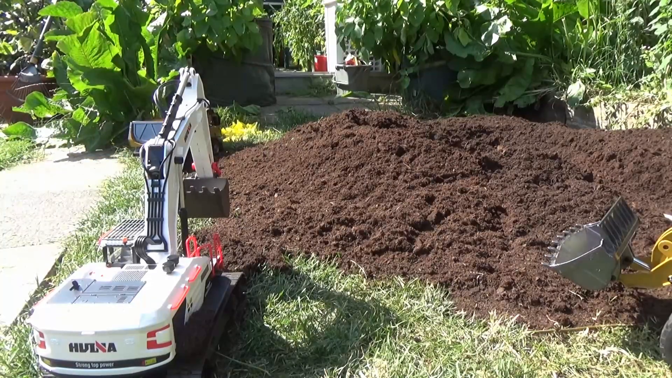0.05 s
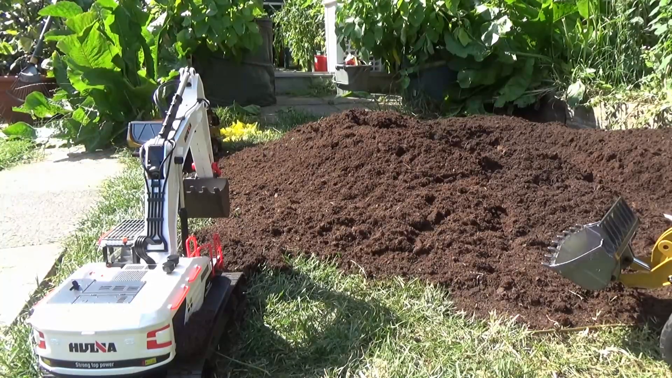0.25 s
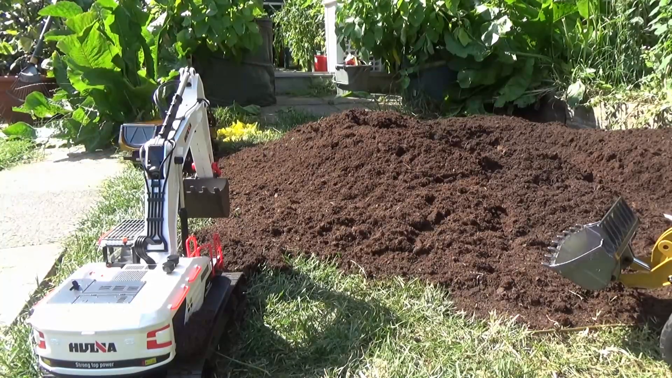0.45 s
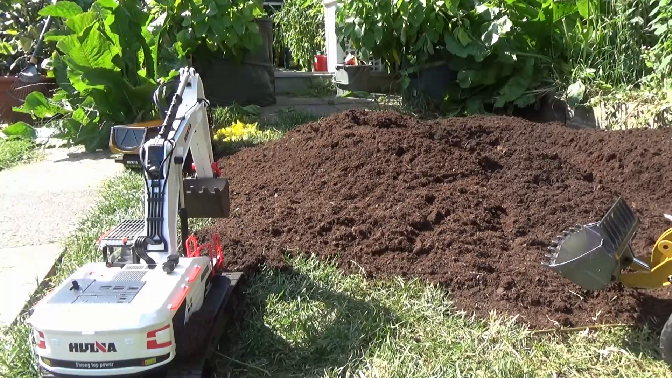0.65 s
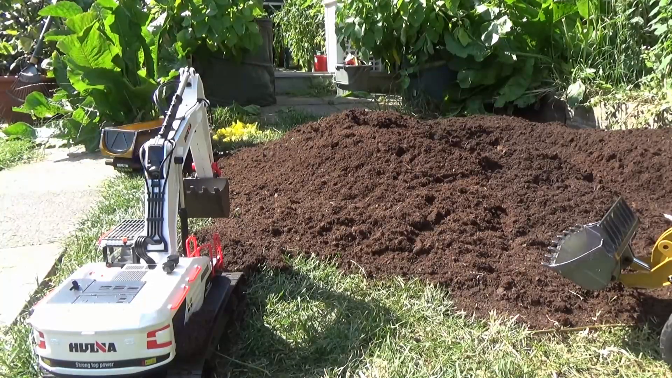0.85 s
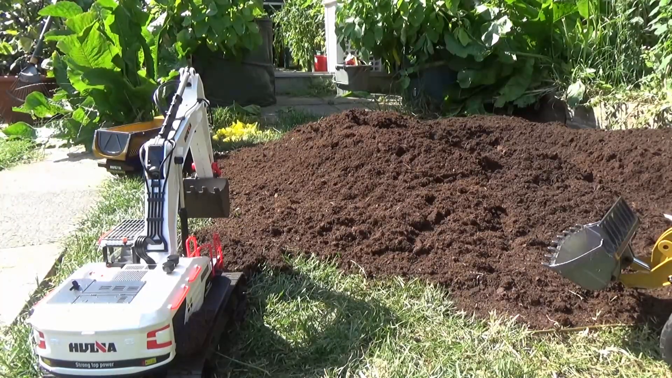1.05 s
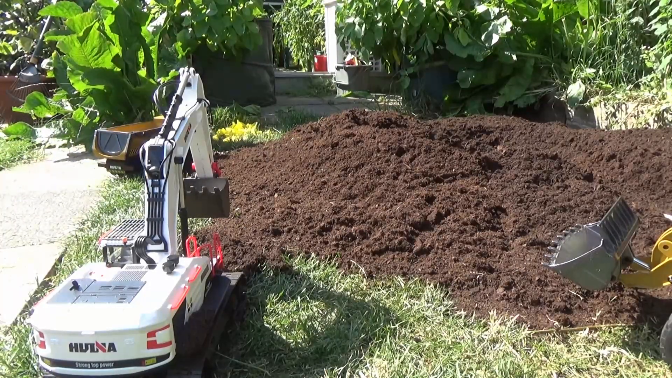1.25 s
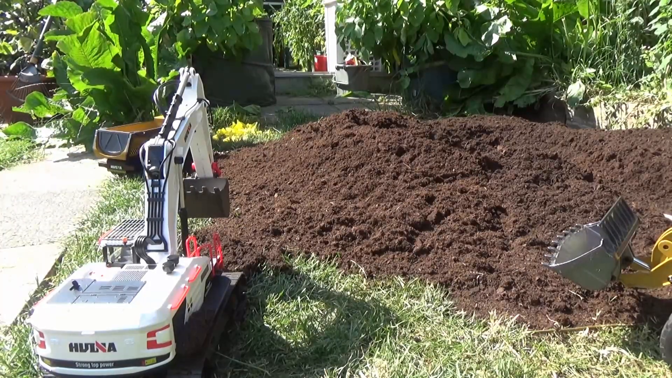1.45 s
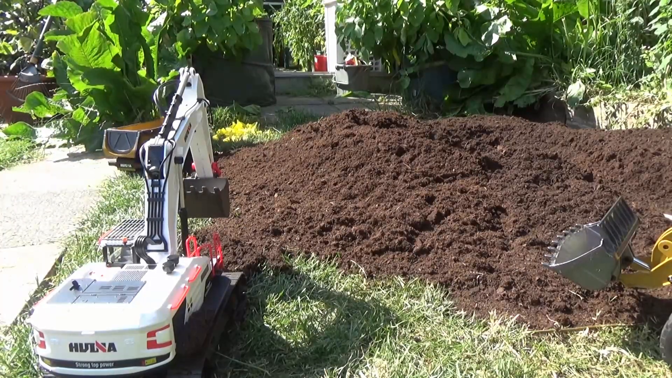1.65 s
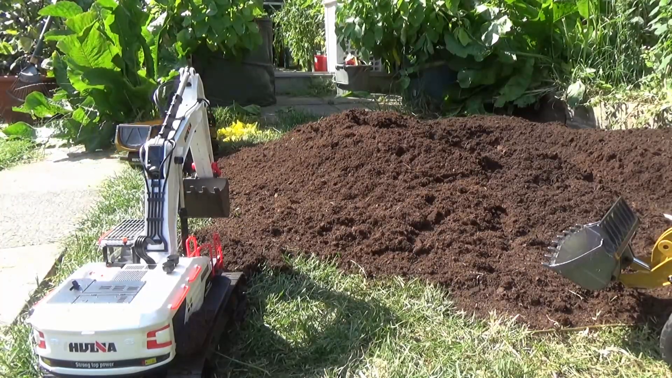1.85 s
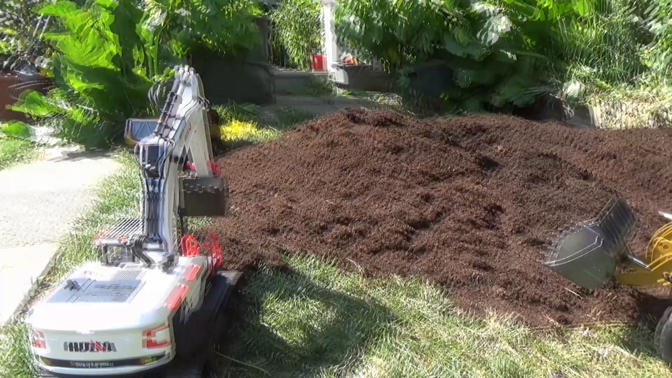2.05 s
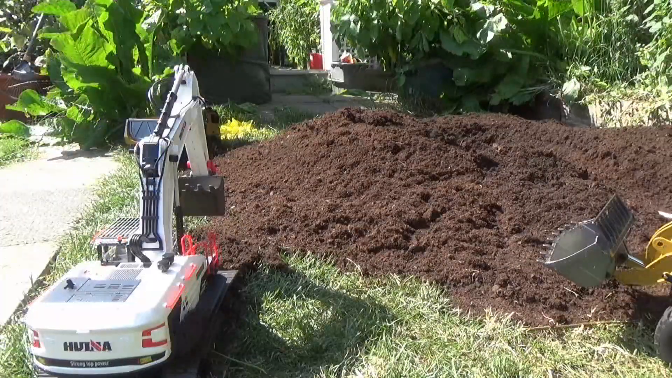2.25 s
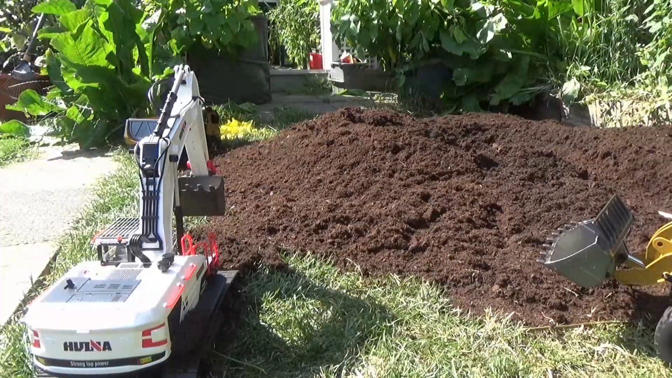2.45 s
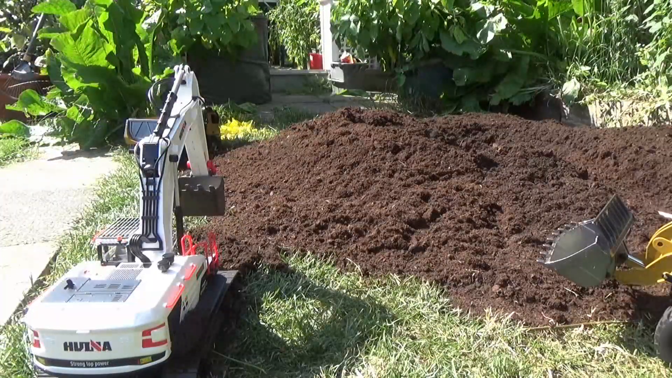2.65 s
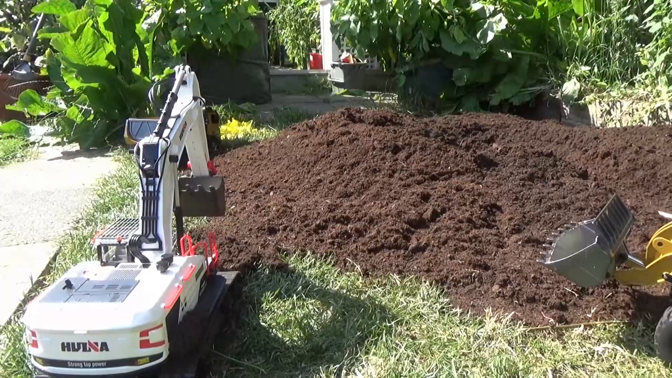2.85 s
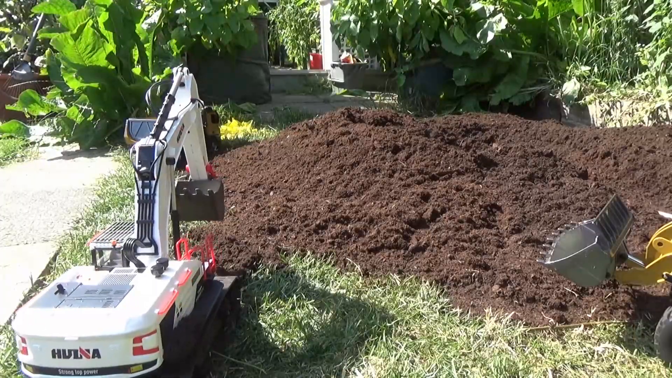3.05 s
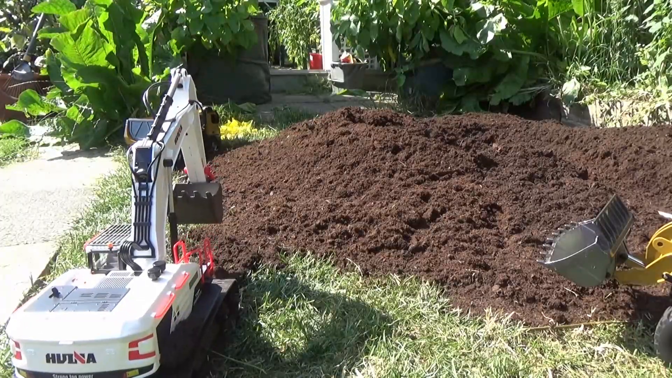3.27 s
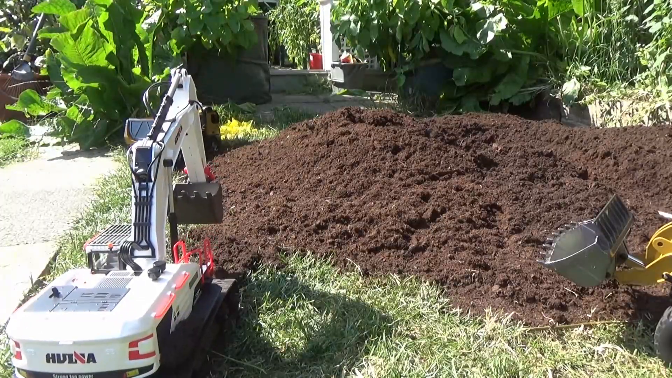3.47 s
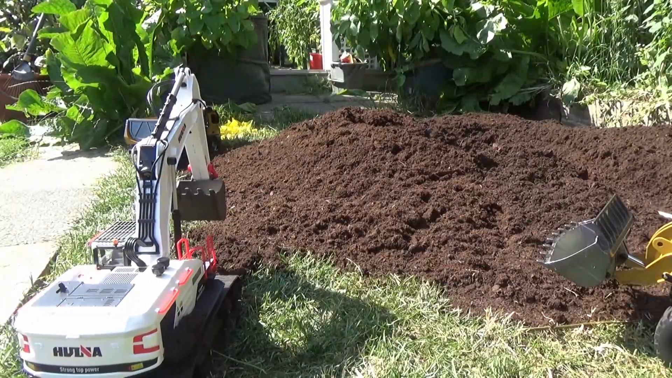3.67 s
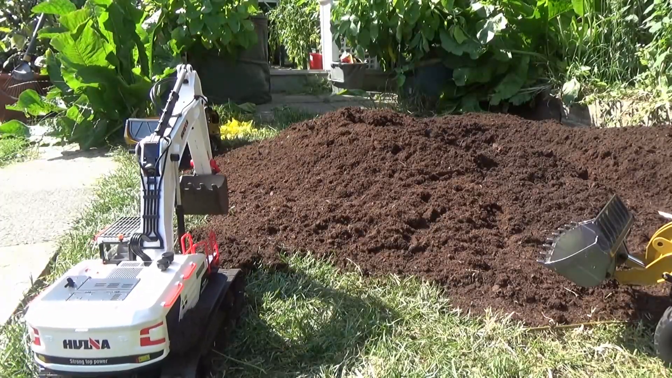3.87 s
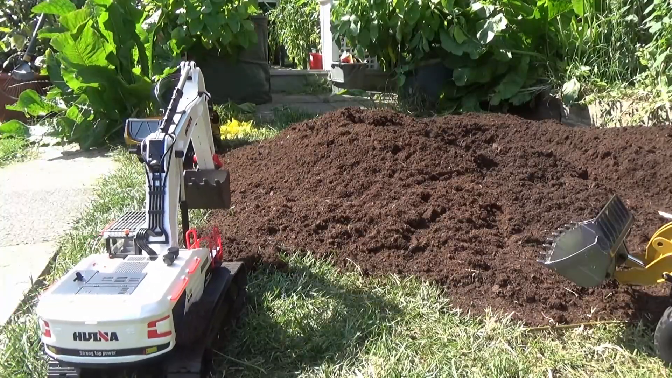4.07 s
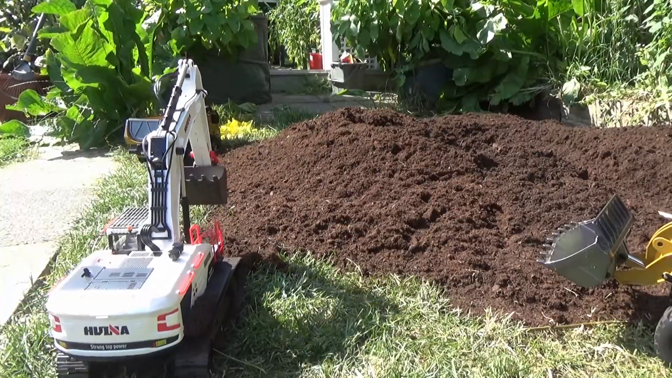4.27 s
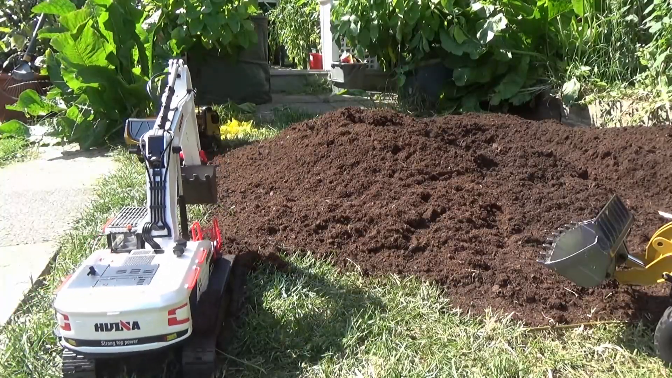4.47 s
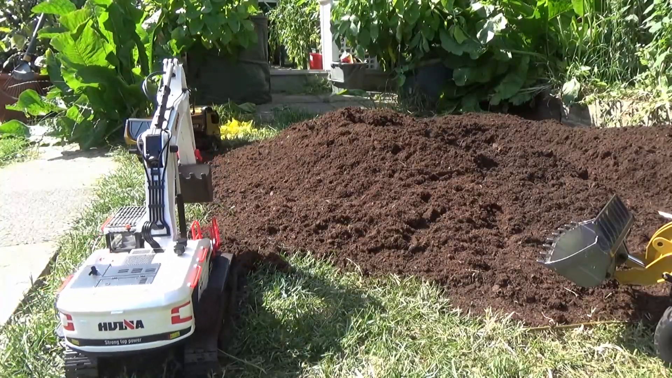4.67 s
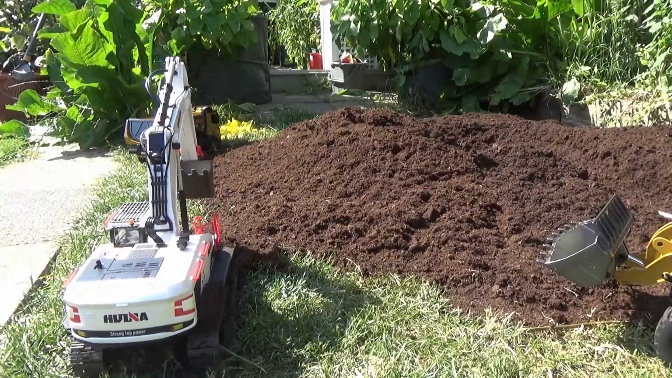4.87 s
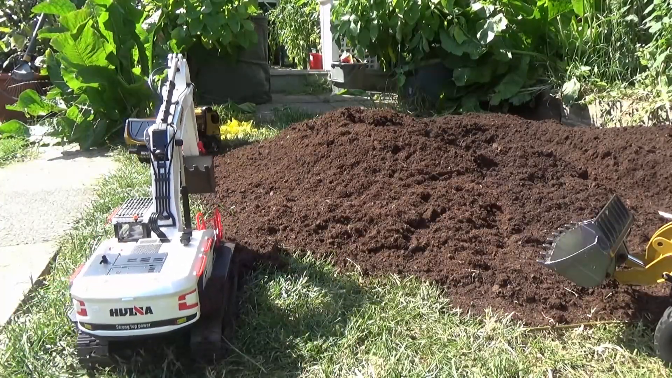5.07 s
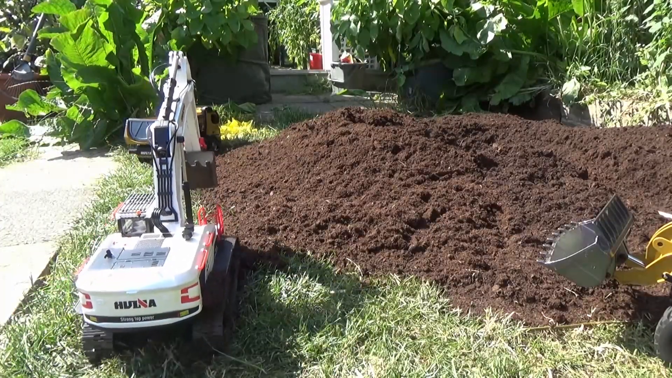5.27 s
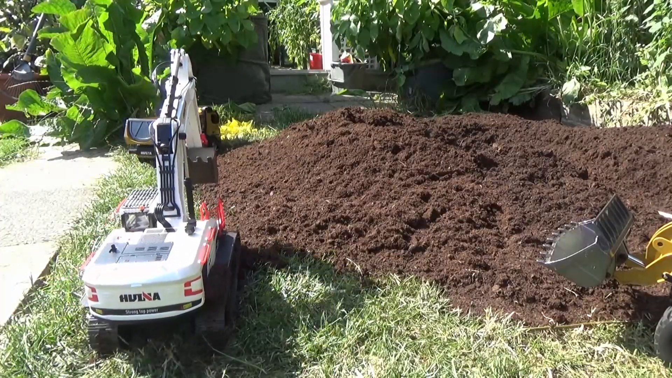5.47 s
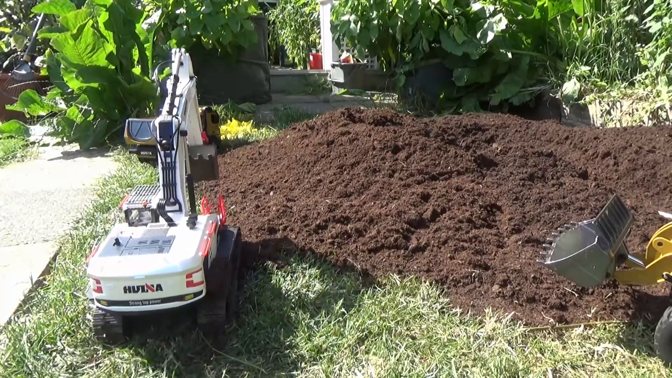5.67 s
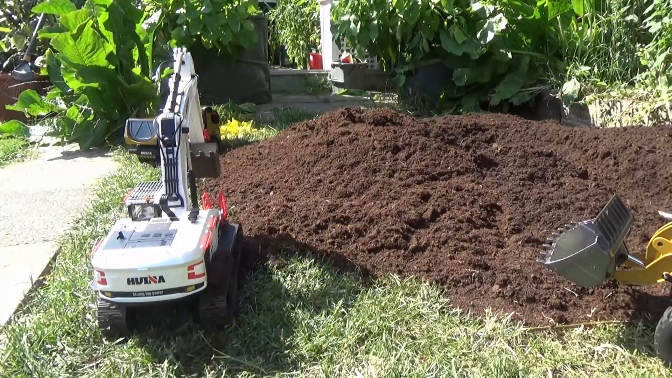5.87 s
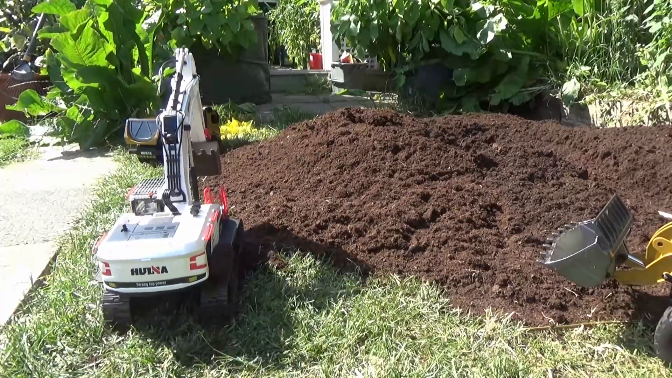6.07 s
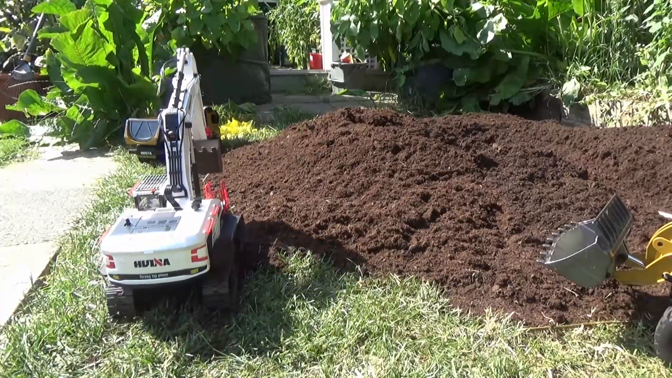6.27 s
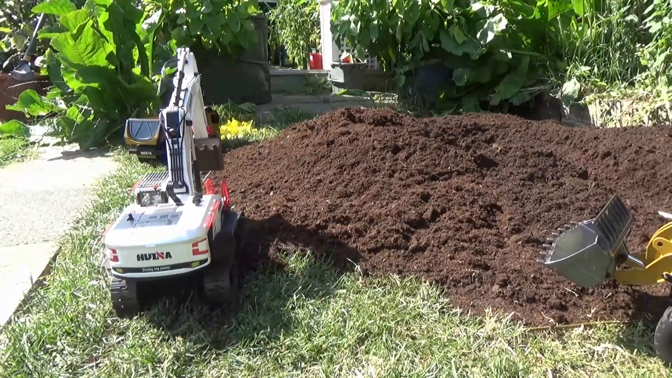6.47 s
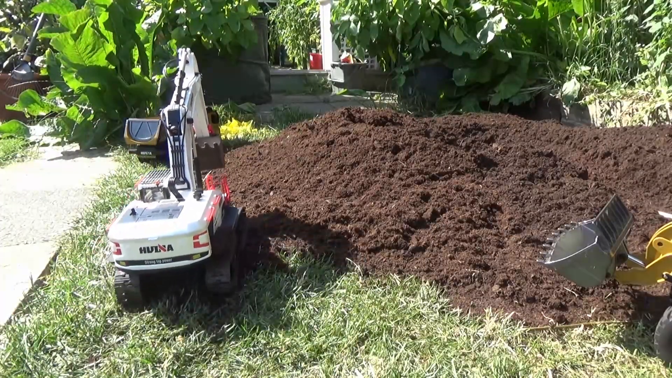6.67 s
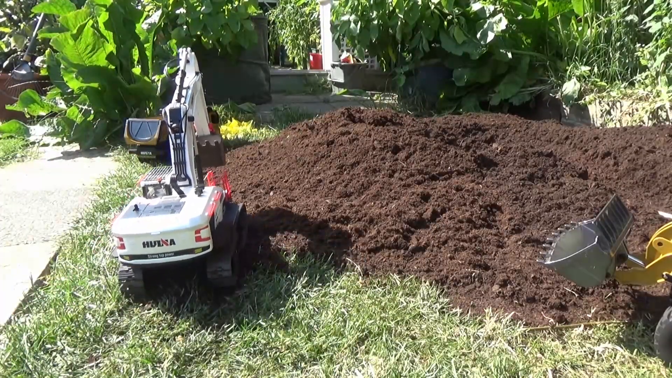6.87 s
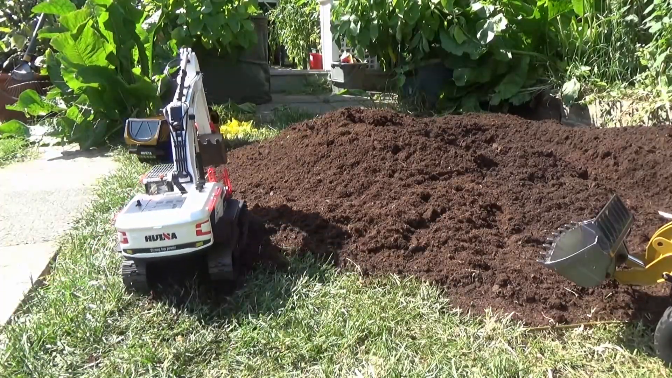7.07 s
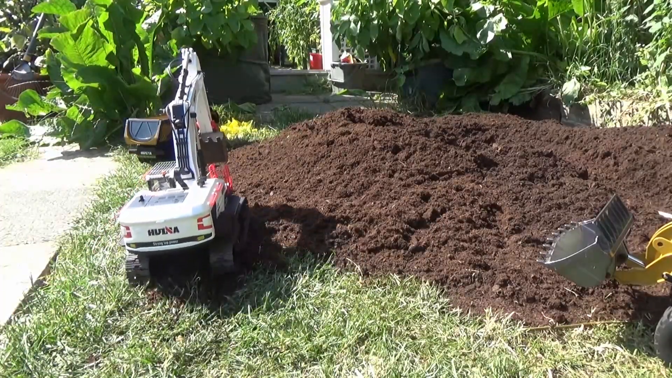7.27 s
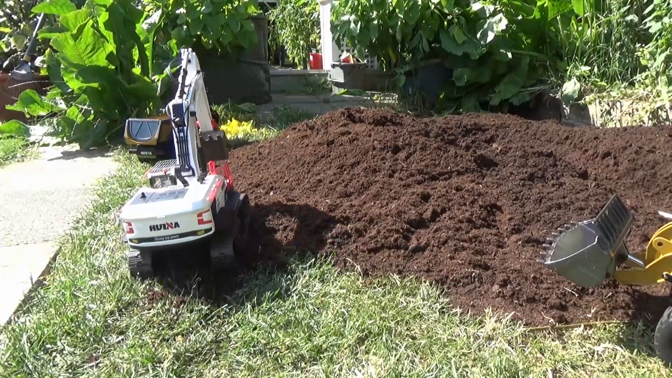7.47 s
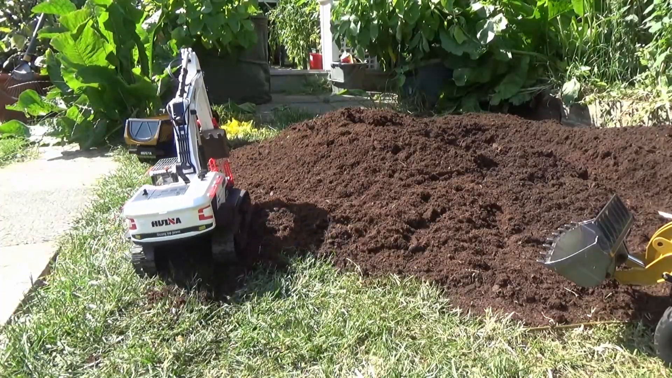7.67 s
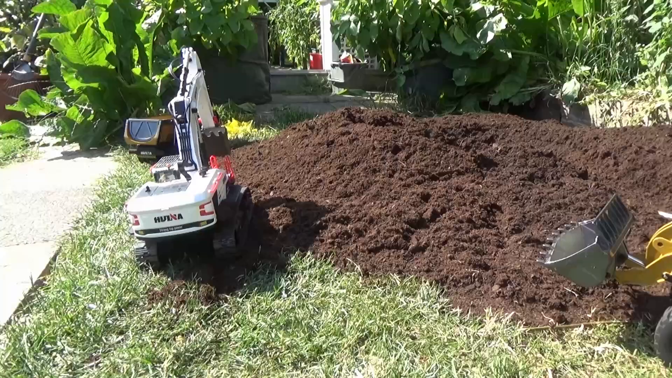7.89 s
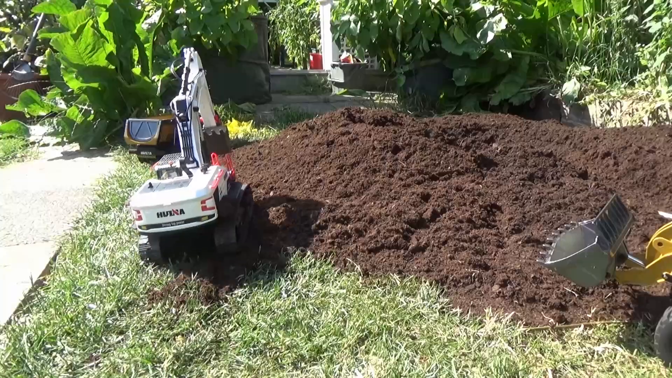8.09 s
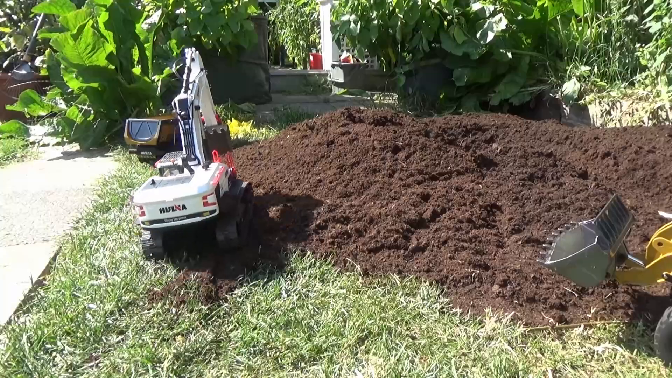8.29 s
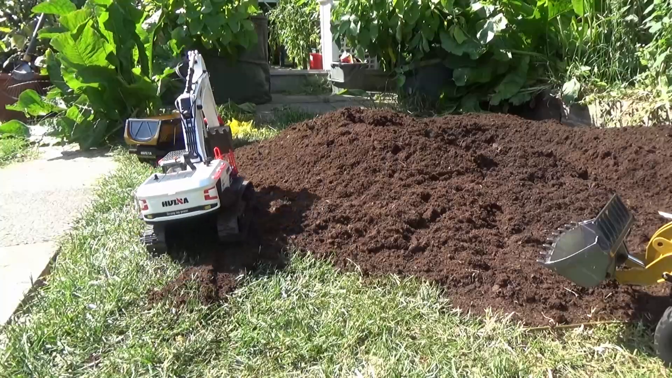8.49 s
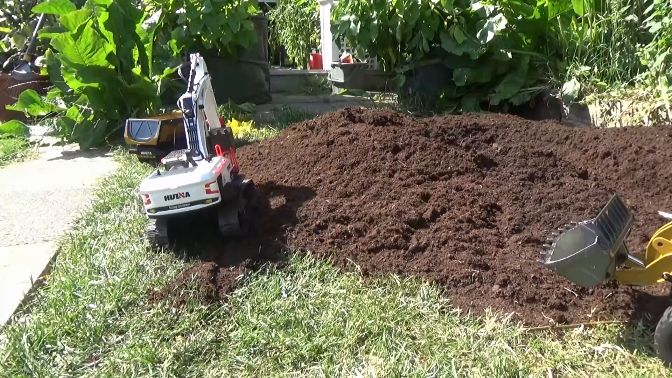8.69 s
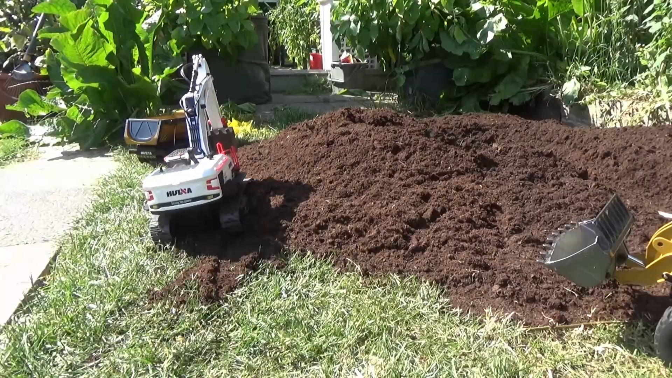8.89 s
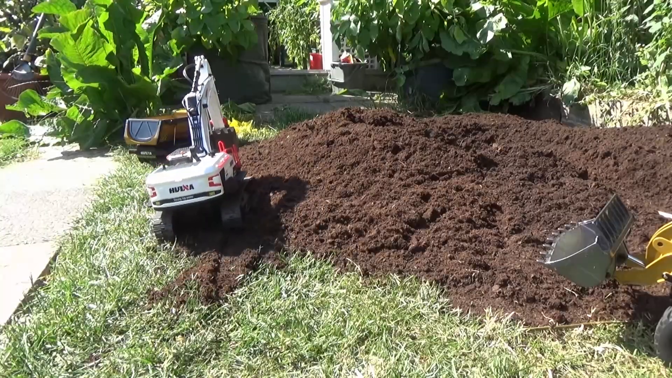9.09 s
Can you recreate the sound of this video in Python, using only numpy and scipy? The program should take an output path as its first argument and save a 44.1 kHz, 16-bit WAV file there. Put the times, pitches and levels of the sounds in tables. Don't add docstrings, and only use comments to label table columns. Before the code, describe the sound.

A close outdoor stereo microphone hears a toy excavator slightly left, with low distant traffic rumble beneath. A remnant of gear rattle dies at once; a thin, steady electronic whine swells around 0.1-0.2 s. From 0.2 to 1.1 s a small motor whirs under load with a light plastic rattle. Ticks and a loud dry knock come near 1.2 s, then the motor swings back from 1.45 to 2.1 s. Quiet, with a soft tap at 2.7 s. At 2.85 s one track motor jerks in a loud, short whirring burst, ending by 3.3 s; a snap and low knock follow until 3.5 s. Then both tracks start a loud, bright, grinding gear whine. One motor drops out around 4.2 s and rejoins at 4.7 s with a brief pitch sag. The wavering buzz continues to the cut at about 9.1 s, with faint high squeaks at 5.3, 7.1-7.5 and 8.5 s.

```python
import sys
import numpy as np
from scipy import signal
from scipy.fft import rfft, irfft, next_fast_len
from scipy.io import wavfile
from scipy.ndimage import uniform_filter1d, map_coordinates

SR = 44100
rng = np.random.default_rng(int(sys.argv[2]) if len(sys.argv) > 2 else 0)


def output_pcm(signal):
    pcm = np.clip(np.atleast_2d(signal).T, -1, 1) * 32767
    wavfile.write(sys.argv[1], SR, np.round(pcm).astype(np.int16))


def to_linear_factor(level_db):
    exponent = np.asarray(level_db, float) / 20
    return 10 ** exponent


N = 403074

# f/Hz, level/dB
GEAR_CASE = [(7200, -10), (8000, -3), (8830, 0), (8980, -4), (9300, -12)]
STALL = .42


def tracks():
    # on t/s, rise t/s, off t/s, fall t/s, level/dB
    rattle_runs = [
        (2.852, .005, 2.87, .04, -9),
        (2.85, .05, 3.19, .145, 1.5),
        (3.505, .09, 10, .1, 0),
    ]
    # t/s, level/dB
    grind = [(3.9, -19), (4.15, -20.5), (4.5, -21), (4.7, -19.5), (4.82, -20.5), (5.6, -18.5), (6.8, -19),
             (7.34, -21), (8, -18.5), (9.14, -20.5)]
    # f/Hz, level/dB per Hz
    housing_low = [(240, -23.5), (400, -18.5), (681, -8.5), (818, -11.5), (1150, -4.5), (1640, 1),
                   (2010, -9), (2300, 0.5), (2900, -10.5), (4600, -8), (5980, -32), (10100, -120)]
    housing_high = [(1650, -27.5), (2800, -18.5), (3740, -10.5), (4000, -5.5), (4300, -16.5), (4650, -2.5),
                    (5830, -6), (6600, -1), (7350, 0), (8260, 6.5), (9080, 3), (9760, -6), (12700, -10.5),
                    (15300, -22.5), (15900, -25)]
    # f/Hz, width/Hz, level/dB
    frame_modes = [(3350, 290, -14.5), (4220, 140, -12), (9950, 210, -13.5), (12100, 320, -14.5),
                   (14600, 420, -9.5)]
    left = left_track()
    right, slack = right_track()
    tones, same, beat = np.add(left, right)
    (effort_db,), _ = curves([grind], off_db=0)
    low_db = -8.5 + 5 * uniform_filter1d(slack * 1., size=900)
    gears = rattle(rattle_runs, effort_db, low_db, 1.0, housing_low, housing_high, frame_modes,
                   same, beat, locked=.45, depth=.078, patchy_db=2.0)
    return tones + to_linear_factor(-2.0) * gears


def left_track():
    # t/s, shaft turns per s, load level/dB
    left_cruise = [(3.826, 231, -0.5), (4.141, 220, 0), (4.205, 231, 2), (4.3, 222, 10.5),
                   (4.45, 225, 10.5), (4.545, 220, 6), (4.69, 227, 6), (4.96, 216, -12), (5.3, 220.5, 1),
                   (6.05, 228, 1), (6.35, 222, -6), (6.8, 226, 0), (7.4, 227, -3), (7.55, 223.3, 2),
                   (8.05, 228, -7.5), (8.19, 224, -10), (8.8, 227.5, -21), (9.14, 222.5, -7)]
    # on t/s, off t/s, share of speed at take-up, spin-up t/s, bluntness of the spin-up
    left_runs = [
        (3.52, 10, .45, .07, 1.1),
    ]
    left_orders = [
        [3, 4.69, 6, 7.69, 8, 15, 17.7],
        [10],
        [20, 24],
        [30, 35],
        [38, 40, 46, 50],
    ]
    left_strengths = [
        [-1, -4, -1, -2, -2, -5, 1],
        [0],
        [-1, -12],
        [0, -7],
        [-11, 0, -17, -15],
    ]
    # level/dB at full speed, dB per decade of speed, share of load, dB added while speed changes
    left_laws = [(-45, 150, .4, 0), (-33.5, 0, 1.05, 7), (-31.5, -20, .1, 0), (-29.5, 70, .1, 0),
                 (-21.5, 0, -.1, 0)]
    # share of speed lost, fall t/s, recovery t/s
    battery_sag = (.33, .016, .07)
    lost, fall, recovery = battery_sag
    since_sag = np.clip(np.arange(N) / SR - 4.71, 0, None)
    share, meshed = throttle(left_runs)
    sag = lost * (1 - np.exp(-since_sag / fall)) * np.exp(-since_sag / recovery)
    speed, off_db, levels = drive(left_cruise, share * (1 - sag), meshed, left_laws)
    levels[-1] += along(GEAR_CASE, 40 * speed)
    return motor(speed, off_db, levels, left_orders, left_strengths, sway=.0022, flutter_db=2.6, fade=.5)


def right_track():
    # t/s, shaft turns per s, load level/dB
    right_cruise = [(3.7, 238.1, -1.5), (4.15, 229.3, 0), (4.9, 232, -1.5), (5.08, 221.3, 0.5),
                    (5.49, 233.4, 2), (6.05, 239.3, 3.5), (6.12, 233.2, 3), (6.22, 238, 3), (6.44, 228, -4),
                    (6.735, 238.2, -3), (6.864, 232.7, -1), (7.064, 236.9, -0.5), (7.35, 240.8, -2),
                    (7.683, 236.5, -6), (7.98, 239, 1.5), (8.526, 234.9, -3), (8.825, 237.7, -10),
                    (9.14, 231.2, -7)]
    # on t/s, off t/s, share of speed at take-up, spin-up t/s, bluntness of the spin-up
    right_runs = [
        (2.855, 3.158, .45, .115, 1.9),
        (3.515, 4.165, .55, .05, 1.05),
        (4.72, 10, .55, .055, 1.05),
    ]
    right_orders = [
        [3, 5, 6, 7],
        [9, 10, 10.31],
        [19, 20, 21, 30],
        [40],
    ]
    right_strengths = [
        [-9, 1, 1, -2],
        [-10, 0, -11],
        [-5, 0, -7, -9],
        [-2],
    ]
    # level/dB at full speed, dB per decade of speed, share of load, dB added while speed changes
    right_laws = [(-39.5, 110, .2, 0), (-36, 10, 1.05, 11), (-33.5, 35, -.55, 0), (-25, 5, .05, 0)]
    backing_db = [2.1, 8.9, 4.8, .3]
    backing = np.arange(N) / SR < 3.4
    share, meshed = throttle(right_runs)
    speed, off_db, levels = drive(right_cruise, share, meshed, right_laws)
    levels = [level + db * backing for level, db in zip(levels, backing_db)]
    speed = speed * np.where(backing, .93, 1)
    levels[-1] += along(GEAR_CASE, 40 * speed / 1.027)
    sound = motor(speed, off_db, levels, right_orders, right_strengths, sway=.0025, flutter_db=2.8, fade=1.8)
    return sound, (share > STALL) & ~meshed


def throttle(runs):
    coast_s, take_up_s = .2, .0516
    t = np.arange(N) / SR
    share, slack = np.zeros(N), np.zeros(N, bool)
    for on, off, first, spin_up, blunt in runs:
        lag = np.exp(-(np.clip(t - on, 0, None) / spin_up) ** blunt)
        rise = (t > on) * (1 - (1 - first) * lag)
        share += rise * np.clip(1 - (t - off) / coast_s, 0, 1)
        slack |= (t > on) & (t < on + take_up_s)
    return share, (share > STALL) & ~slack


def drive(cruise, share, meshed, laws):
    brisk = 710
    (full, load_db), _ = curves([cruise], off_db=0)
    off_db = -60 * (1 - uniform_filter1d(meshed * 1., size=600))
    share = np.maximum(share, STALL)
    strain = np.tanh(np.abs(np.gradient(full.mean() * share)) * SR / brisk)
    levels = [db + slope * np.log10(share) + part * load_db + push * strain for db, slope, part, push in laws]
    return full * share, off_db, levels


def slewing():
    # t/s, shaft turns per s, load level/dB
    swings = [
        [(.224, 147, -11), (.346, 143, 1.5), (.412, 146, -6), (.6, 147, -1), (.768, 141, 2), (.864, 140, -6),
         (.984, 155, 0.5), (1.078, 160, -18)],
        [(1.472, 131, -8), (1.495, 135, 7.5), (1.65, 149, 4.5), (1.735, 143.5, -1), (1.807, 157, -3),
         (1.865, 145, 0), (2.061, 153, -4.5), (2.095, 150, 1)],
    ]
    slew_orders = [
        [3, 4, 5, 6],
        [8, 9],
        [15.15, 18],
        [27],
    ]
    slew_strengths = [
        [-7, -2, -10, -10],
        [1, 1],
        [-14, -1],
        [-2],
    ]
    flanks = [
        (-43, -41, -30, -33.5),
        (-40, -49, -28, -42),
    ]
    # on t/s, rise t/s, off t/s, fall t/s, level/dB
    swing_runs = [
        (-.3, .1, -.06, .13, -22),
        (.178, .075, 1.025, .17, -21),
        (1.435, .062, 2.082, .022, -21),
    ]
    # f/Hz, level/dB per Hz
    swing_low = [(180, -43), (300, -25), (566, -8.5), (1300, -9), (1650, -15), (2000, -9), (2600, -33),
                 (4400, -120)]
    swing_high = [(1200, -53), (2100, -1), (4000, -3), (6300, -3.5), (7000, -4), (7800, -3), (11000, -2.5),
                  (16000, -14.5)]
    # f/Hz, width/Hz, level/dB
    shell_modes = [(2516, 235, -5), (3200, 134, -1.5), (3910, 390, -3), (4274, 70, -0.5), (4710, 97, -3.5),
                   (5280, 130, -4), (5930, 80, -5.5), (6530, 40, -4), (7620, 380, -7.5), (8670, 130, -3.5),
                   (9180, 62, -5.5), (10320, 210, -7), (11900, 64, -11)]
    (speed, load_db), off_db = curves(swings, off_db=-93)
    outward = np.arange(N) / SR < 1.3
    levels = [load_db + np.where(outward, out_db, back_db) for out_db, back_db in zip(*flanks)]
    tones, same, beat = motor(speed, off_db, levels, slew_orders, slew_strengths,
                              sway=.007, flutter_db=3, fade=.5)
    gears = rattle(swing_runs, 0, -11, .65, swing_low, swing_high, shell_modes,
                   same, beat, locked=.38, depth=.14, patchy_db=.9)
    return tones + to_linear_factor(-1.1) * gears


def motor(speed, off_db, family_db, orders, strengths, sway, flutter_db, fade):
    hunt, drift_db = .0055, 1.7
    speed = speed * (1 + hunt * wobble(15))
    turns = np.cumsum(speed) / SR + sway * wobble(60)
    slack_db = fade * np.log10(speed / speed.max())
    tones = np.zeros(N)
    for level, family, dbs in zip(family_db, orders, strengths):
        level = level + drift_db * wobble(6)
        for k, db in zip(family, dbs):
            gain = to_linear_factor(level + off_db + db + 3.0 + k * slack_db + flutter_db * wobble(30))
            tones += gain * np.sin(2 * np.pi * (k * turns + rng.random()))
    flaws = rng.standard_normal((int(N / SR * 6) + 3, 1, 128))
    flaws = flaws.repeat(2, axis=1).reshape(-1, 256)
    same = map_coordinates(flaws, [np.arange(N) / SR * 6, turns % 1 * 128], order=1)
    beat = np.cos(2 * np.pi * turns) + 0.54 * np.cos(4 * np.pi * turns + 1)
    return tones, same * to_linear_factor(off_db), beat * to_linear_factor(off_db)


def rattle(runs, effort_db, low_db, dulls, low, high, peaks, same, beat, locked, depth, patchy_db):
    ease, deepest_db = 2.13, 22.5
    t = np.arange(N) / SR
    size = np.zeros(N)
    for on, rise, off, fall, db in runs:
        ramp = np.clip(np.minimum((t - on) / rise, 1 - (t - off) / fall), 0, 1)
        size += to_linear_factor(db) * ramp ** ease
    faint_db = np.minimum(-20 * np.log10(size / size.max() + 1e-9), deepest_db)
    raw = patchy(patchy_db, channels=2) * (1 + depth * beat) * to_linear_factor(0.76 * wobble(30))
    raw = unit(raw) + locked * same
    bright = coloured(modes(raw[0], peaks, between_db=-17.5), high)
    dull = to_linear_factor(low_db + dulls * faint_db - 4.0) * coloured(raw[1], low)
    return size * to_linear_factor(effort_db) * (bright + dull)


def modes(x, peaks, between_db):
    def response(f):
        total = 0
        for k, (centre, width, db) in enumerate(peaks):
            bell = 1j * f * width / (centre * centre - f * f + 1j * f * width)
            total = total + (-1) ** k * to_linear_factor(db) * bell
        return to_linear_factor(between_db) + abs(total)
    return filtered(x, response)


def whine():
    # f/Hz, level/dB
    chopper = [(2428, -43), (4856, -49), (7300, -48), (9733, -57), (12150, -65), (14567, -65)]
    # t/s, level/dB
    chopper_swell = [(.08, 0), (.11, 3), (.18, 10), (.21, -10), (.23, -30)]
    (swell_db,), off_db = curves([chopper_swell], off_db=-66)
    t = np.arange(N) / SR
    return to_linear_factor(swell_db + off_db) * sum(to_linear_factor(db - 3.0) * np.sin(2 * np.pi * hz * t) for hz, db in chopper)


def squeak():
    # t/s, f/Hz, level/dB
    squeaks = [
        [(5.24, 11000, -43), (5.274, 10670, -42), (5.43, 10540, -46)],
        [(7.124, 11560, -34.5), (7.426, 11900, -28), (7.47, 11900, -38)],
        [(8.451, 11450, -35), (8.481, 11490, -30), (8.51, 11750, -40)],]
    (hz, db), off_db = curves(squeaks, off_db=-74)
    gain = to_linear_factor(db + off_db + 9.5 + 2.8 * wobble(90))
    return gain * np.sin(2 * np.pi * np.cumsum(hz + 35 * wobble(150)) / SR)


def clicks():
    # t/s, peak level/dB, ring f/Hz, ring t60/s, crack level/dB relative to the ring
    parts = [
        (1.168, -44, 1100, 0.022, 0),
        (1.205, -36, 2500, .01, -4.5),
        (1.211, -29, 670, 0.042, -10),
        (1.252, -14, 1030, 0.011, -25.5),
        (2.675, -40, 1010, .06, -25),
        (3.352, -43, 2980, 0.011, -4.5),
        (3.393, -25.5, 8500, 0.0054, -5),
        (3.408, -46, 11000, .01, -3),
        (3.436, -43, 5000, 0.014, -11),
        (3.514, -23.5, 750, 0.05, -8.5),
    ]
    out, t = np.zeros(N + SR), np.arange(SR // 8) / SR
    for s, db, hz, t60, crack_db in parts:
        ring = to_linear_factor(-60 * t / t60) * np.sin(2 * np.pi * hz * t) * (1 - np.exp(-t / 0.00011))
        band = signal.butter(2, [hz / 2.9, min(2.4 * hz, 12000)], "band", fs=SR)
        grit = unit(signal.lfilter(*band, rng.standard_normal(len(t))))
        decay = to_linear_factor(-60 * t / 0.024) + 0.12 * to_linear_factor(-60 * t / 0.17)
        out[round(s * SR):][:len(t)] += to_linear_factor(db) * (ring + to_linear_factor(crack_db + 5) * grit * decay)
    return out[:N]


def town():
    # t/s, level/dB
    town_level = [(0.0, -43), (1.07, -41.5), (2.7, -43), (2.9, -47), (4.38, -52), (9.14, -49)]
    # f/Hz, level/dB per Hz
    rumble = [(12, -33), (20, -11), (167, -3.5), (203, -9.5), (444, -13.5), (526, -19.5), (639, -12.5),
              (715, -18), (799, -20.5), (869, -17), (999, -16.5), (2310, -30), (5970, -31), (14600, -36),
              (15900, -43)]
    # f/Hz, correlation
    likeness = [(30, .995), (240, .95), (950, .92), (15000, .9)]

    def mid_side(hz):
        angle = np.arccos(np.clip(along(likeness, hz), -1, 1)) / 2
        return to_linear_factor(along(rumble, hz)) * [np.cos(angle), np.sin(angle)]
    (db,), _ = curves([town_level], off_db=0)
    mid, side = filtered(patchy(1.2, channels=2), mid_side)
    return to_linear_factor(db + 1.0 + 0.4 * wobble(4)) * unit(np.array([mid + side, mid - side]))


def unit(x):
    return x / np.sqrt(np.mean(x ** 2) + 1e-20)


def along(points, hz):
    f, v = np.transpose(points)
    return np.interp(np.log(hz + 1), np.log(f + 1), v)


def curves(runs, off_db):
    s, *cols = np.transpose(np.concatenate(runs))
    t = np.arange(N) / SR
    on = sum((t > run[0][0]) & (t < run[-1][0]) for run in runs) * 1.
    on = np.clip(uniform_filter1d(on, size=300), 0, 1)
    return np.array([np.interp(t, s, c) for c in cols]), off_db * (1 - on)


def wobble(rate):
    count = int(N * rate / SR) + 2
    return np.interp(np.arange(N) * rate / SR, np.arange(count), rng.standard_normal(count))


def filtered(x, response):
    m = next_fast_len(N + 8192)
    return irfft(rfft(x, m) * response(np.fft.rfftfreq(m, 1 / SR)), m)[..., :N]


def coloured(x, spectrum):
    return unit(filtered(x, lambda hz: to_linear_factor(along(spectrum, hz))))


def patchy(depth_db, channels):
    z = signal.stft(rng.standard_normal((channels, N)), nperseg=512)[2]
    field = uniform_filter1d(rng.standard_normal(z.shape[1:]), size=3, axis=0)
    field = uniform_filter1d(field, size=24, axis=1)
    return signal.istft(z * to_linear_factor(depth_db * unit(field)), nperseg=512)[1][:, :N]


def scene():
    # f/Hz, left minus right level/dB
    lean = [(150, -.4), (380, 2), (800, 3.3), (2380, 1.1), (8000, 1), (15000, 0)]
    # f/Hz, level/dB
    spread = [(60, -26), (300, -12.5), (1000, -15), (3000, -28.5), (8000, -20), (13000, -18)]
    toy = tracks() + slewing() + whine() + squeak() + clicks()
    tail = rng.standard_normal(2000) * to_linear_factor(-60 * np.arange(2000) / SR / 0.3)
    scatter = signal.fftconvolve(toy, tail / np.linalg.norm(tail))[:N]
    scatter = filtered(scatter, lambda hz: to_linear_factor(along(spread, hz)))
    direct = filtered(toy, lambda hz: to_linear_factor(along(lean, hz) * [[.5], [-.5]]))
    return direct + scatter * [[1], [-1]] + town()


def narrowed(x):
    # f/Hz, level/dB under the mean
    least_side = [(100, -27.5), (1500, -23.5), (3500, -15), (8000, -16), (12000, -19.5)]
    hz, _, (mid, side) = signal.stft([x[0] + x[1], x[0] - x[1]], SR, nperseg=2048)
    loudness = np.sqrt(np.mean(np.abs(mid) ** 2, axis=0))
    side = side * (np.abs(side) > to_linear_factor(along(least_side, hz))[:, None] * loudness)
    mid, side = signal.istft([mid, side], nperseg=2048)[1][:, :N]
    return np.array([mid + side, mid - side]) / 2


def roll_off(x):
    return signal.sosfilt(signal.butter(12, 16030, fs=SR, output="sos"), x)


def record(dry):
    soft = dry / (1 + np.abs(dry / .58) ** 4) ** (1 / 4)
    mix = narrowed(filtered(soft, lambda hz: hz < 15740))
    return roll_off(mix)


dry = scene()
out = record(dry)
output_pcm(out)
```